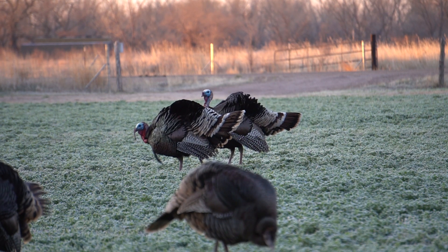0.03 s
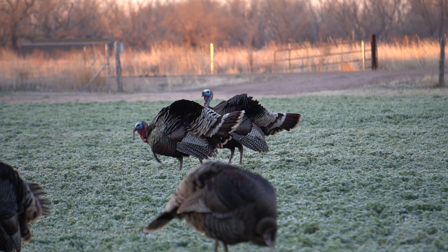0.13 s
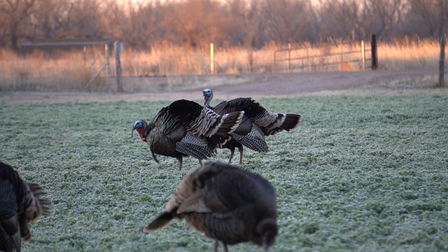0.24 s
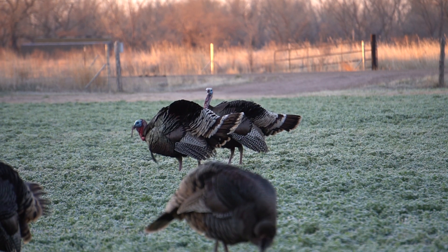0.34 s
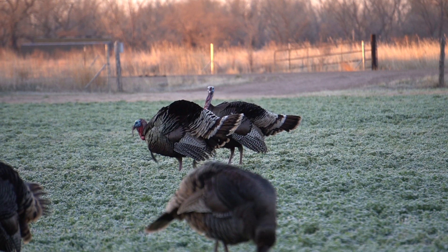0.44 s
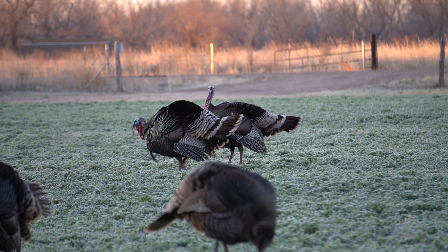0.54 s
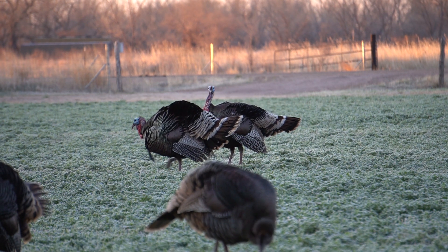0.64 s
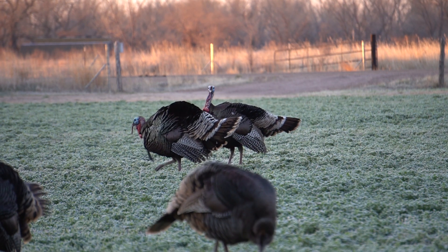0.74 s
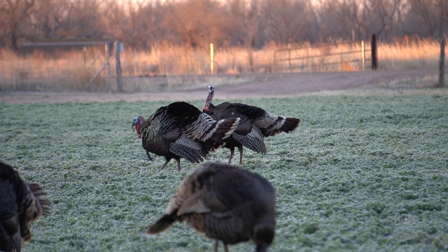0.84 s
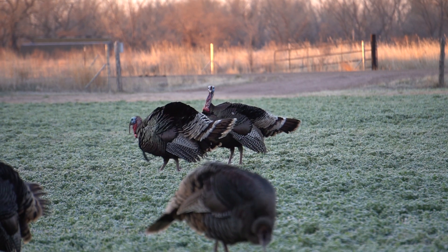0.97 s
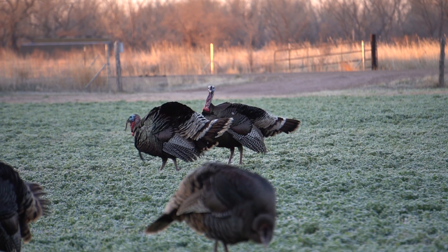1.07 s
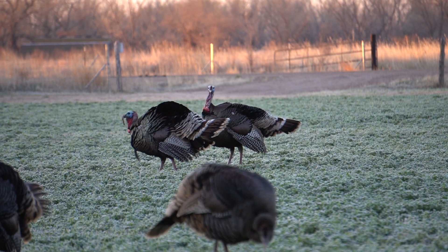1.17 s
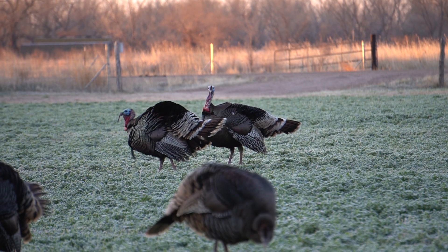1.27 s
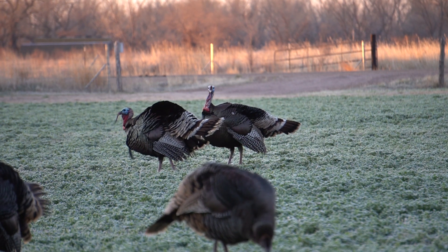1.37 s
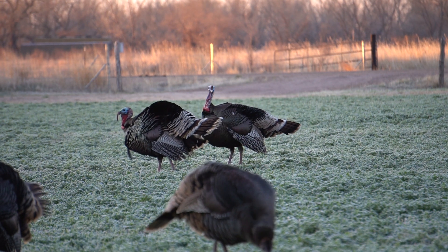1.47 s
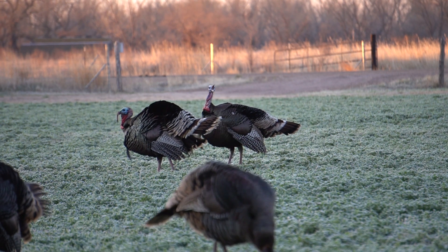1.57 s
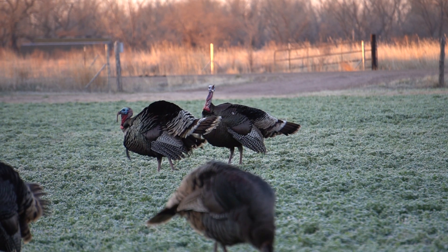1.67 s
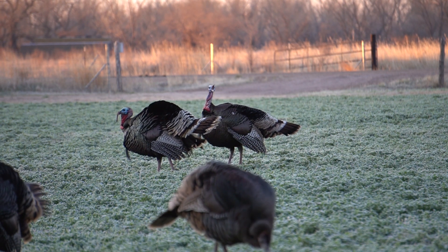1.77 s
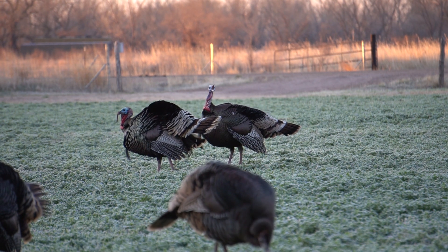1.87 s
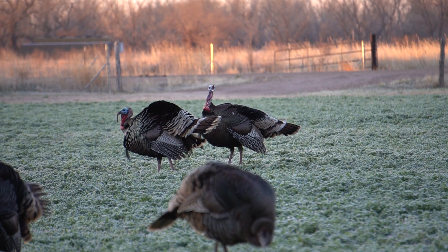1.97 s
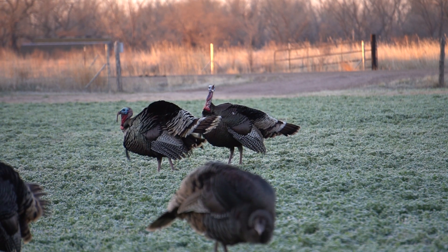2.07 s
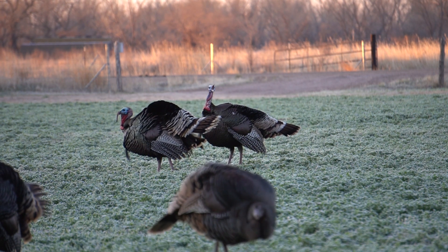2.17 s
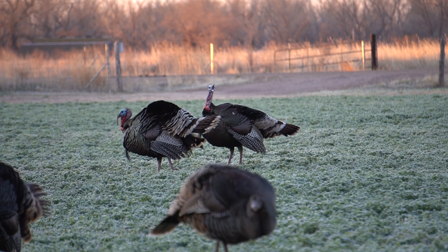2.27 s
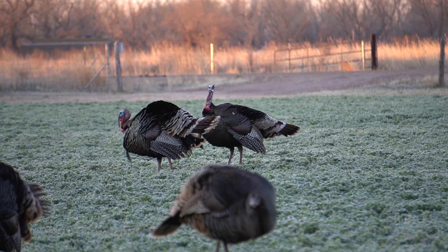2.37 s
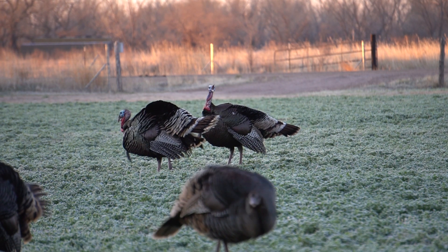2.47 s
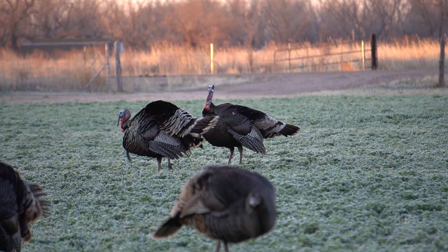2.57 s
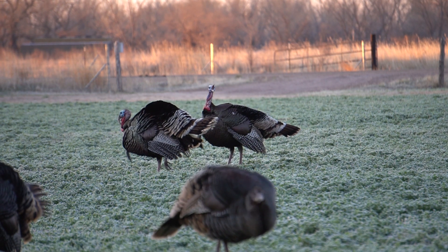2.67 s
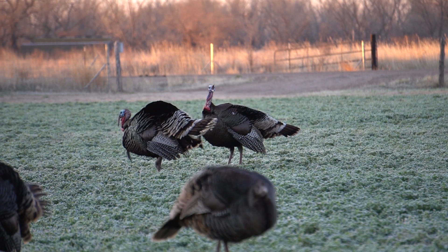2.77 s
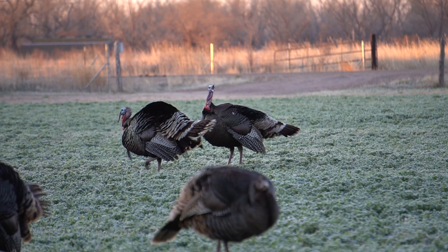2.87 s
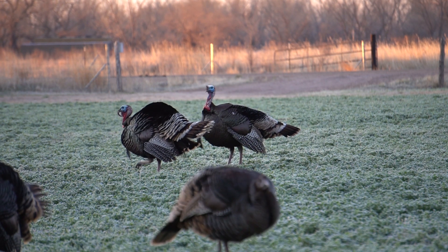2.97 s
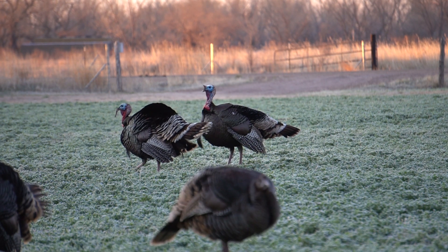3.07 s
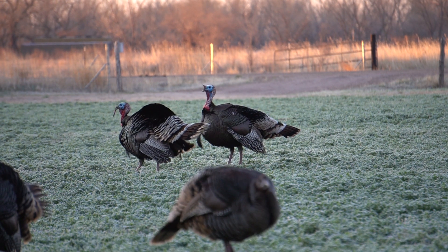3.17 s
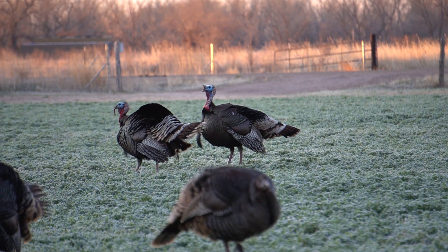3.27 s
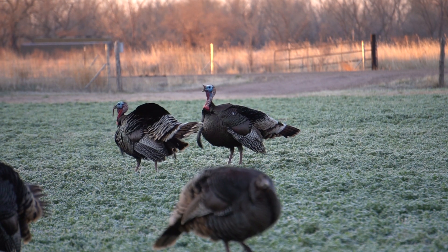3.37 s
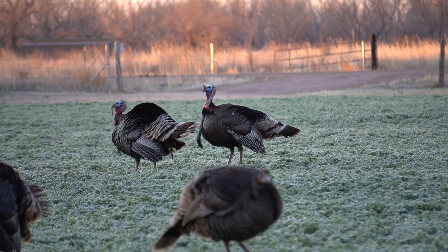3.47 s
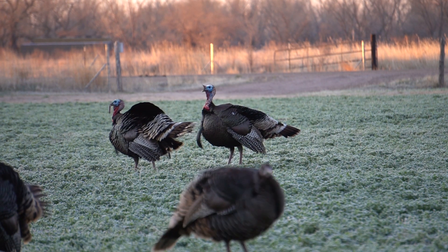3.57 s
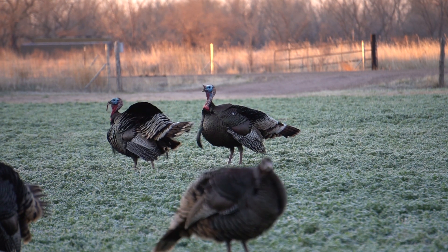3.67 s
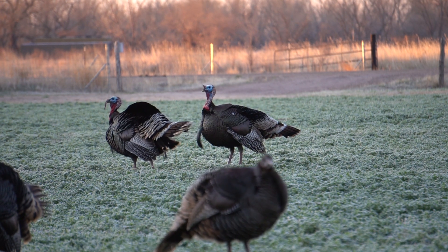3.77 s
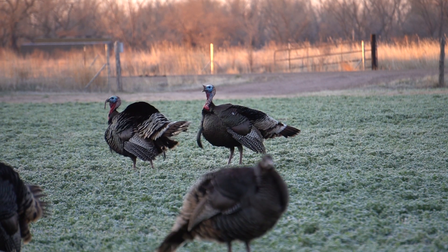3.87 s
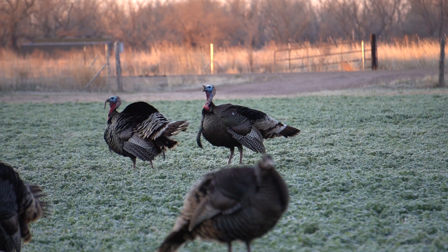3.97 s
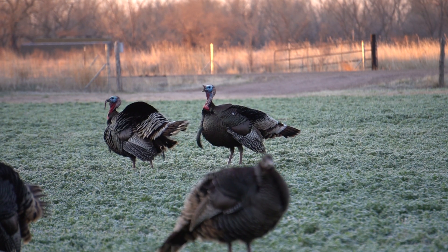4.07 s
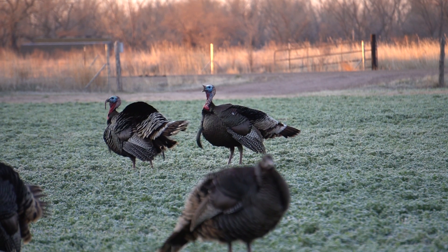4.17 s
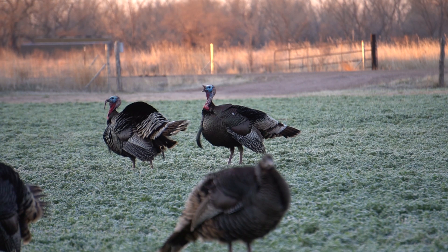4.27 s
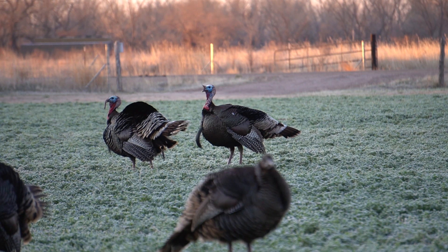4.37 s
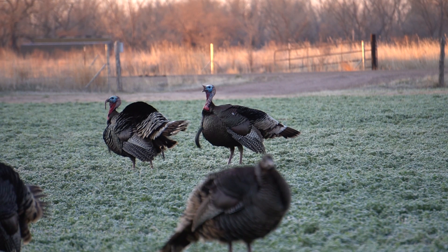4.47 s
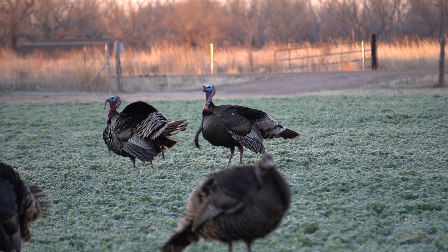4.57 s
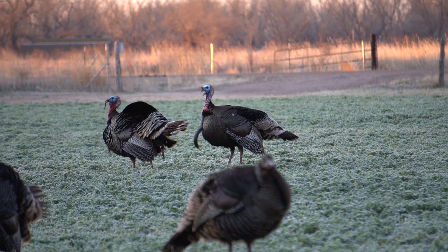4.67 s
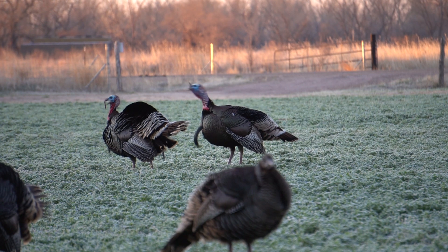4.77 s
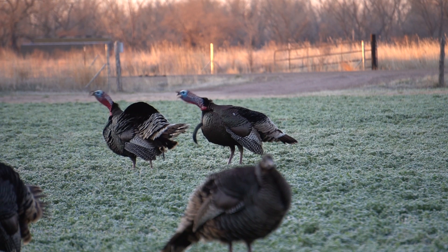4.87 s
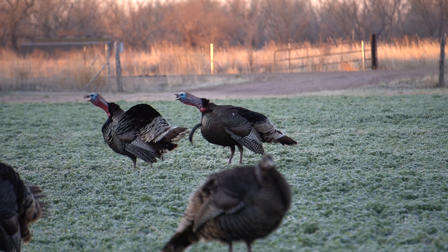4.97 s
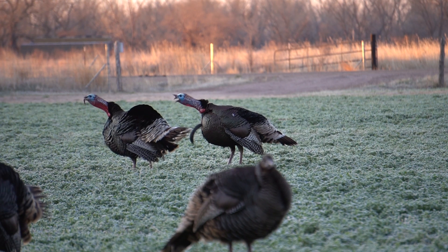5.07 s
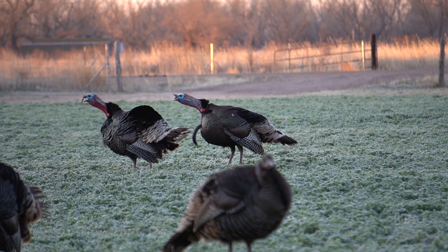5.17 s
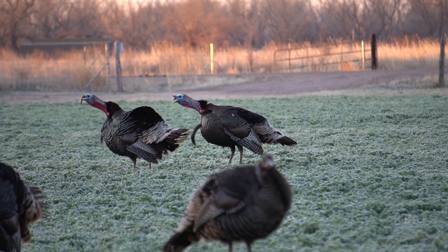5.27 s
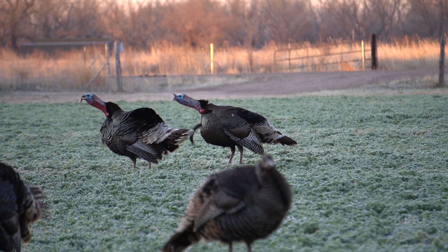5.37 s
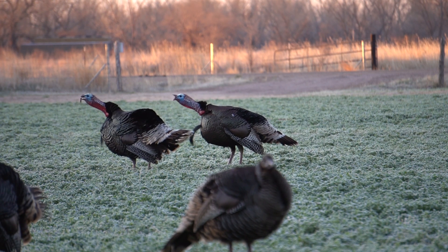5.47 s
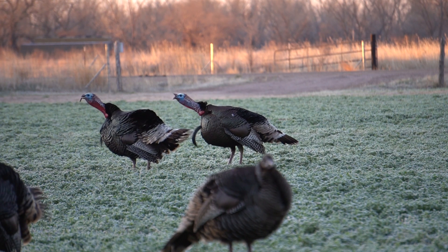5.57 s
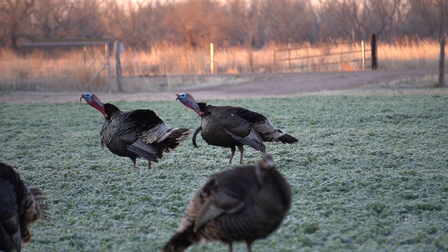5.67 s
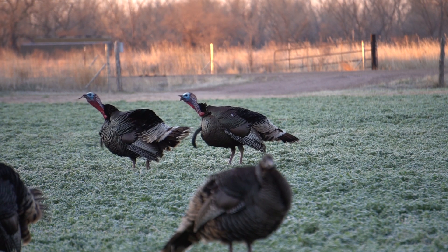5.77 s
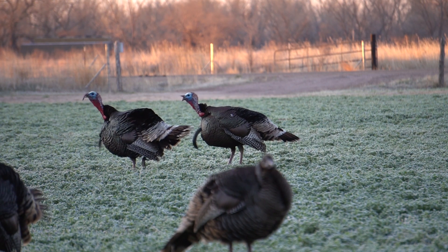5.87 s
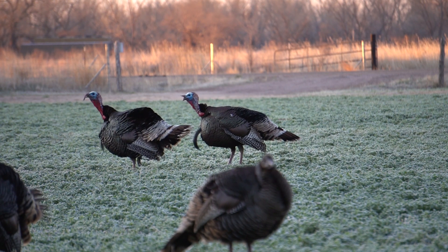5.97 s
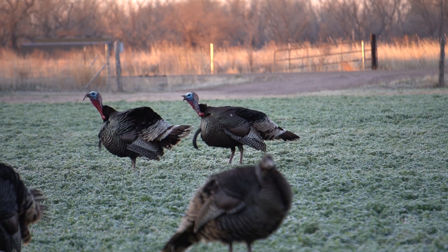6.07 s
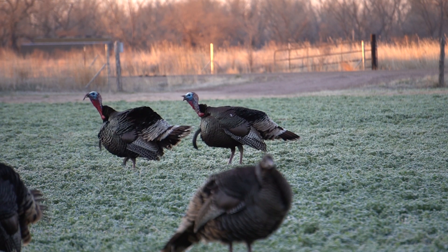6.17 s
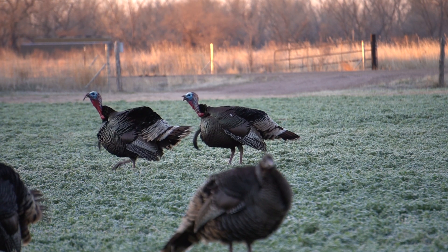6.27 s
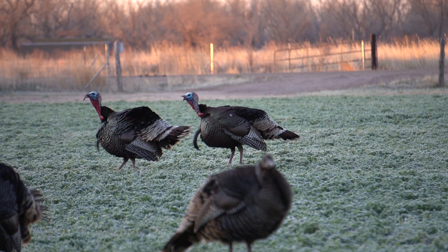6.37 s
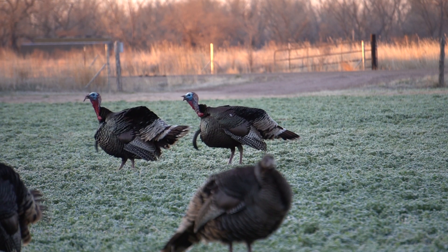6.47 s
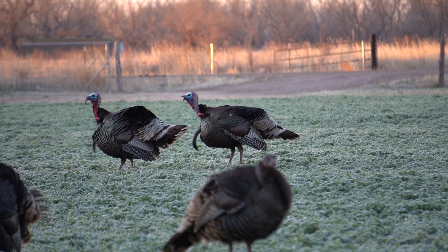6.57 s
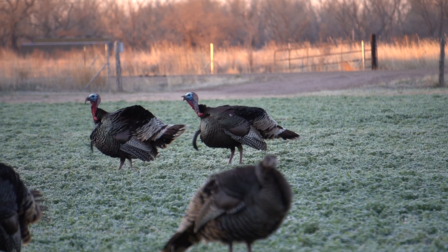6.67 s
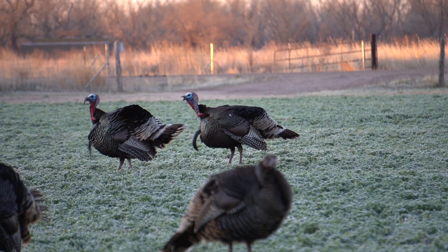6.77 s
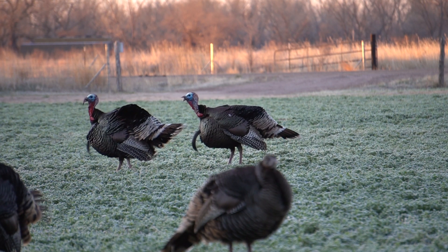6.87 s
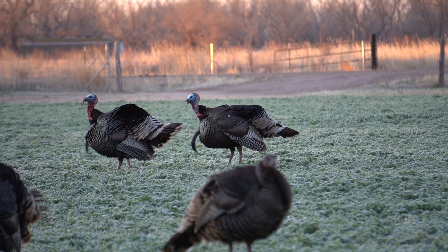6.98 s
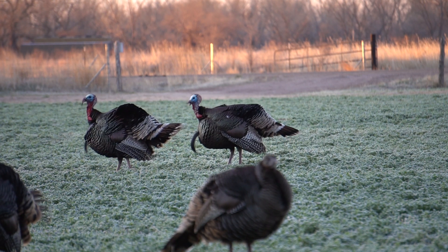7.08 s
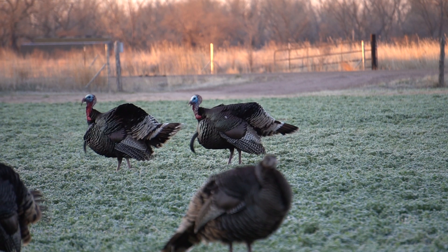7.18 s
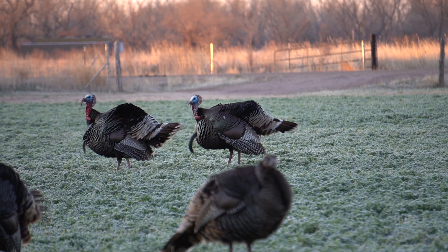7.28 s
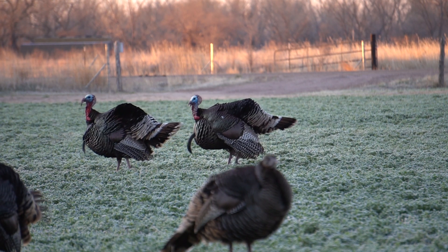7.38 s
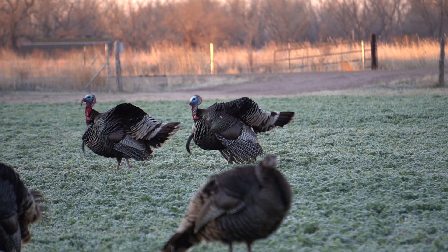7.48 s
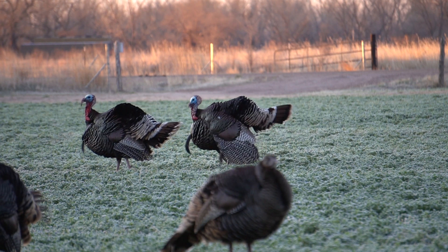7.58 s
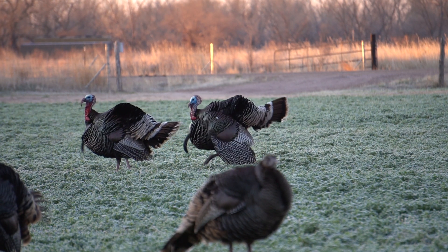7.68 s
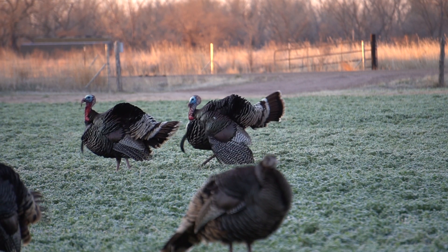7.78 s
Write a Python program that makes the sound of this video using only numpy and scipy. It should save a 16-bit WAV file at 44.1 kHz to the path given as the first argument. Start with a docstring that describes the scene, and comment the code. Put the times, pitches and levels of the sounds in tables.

```python
"""Wild turkeys on a frosty field: a nearby hen gives a long whine of run-together wavering notes and a
run of sharp clucks, made by harmonic pulses through throat resonances. Two toms answer with one rattling
gobble, two such voices in three resonances, opened by harsh yaps over a low drum. Songbirds twitter as
gliding sines in the far trees, above a distant rumble and hiss of shaped noise. Diffuse reflections
surround the birds; gain control ducks the loud calls and clips their onsets."""
import sys
import numpy as np
from scipy import signal
from scipy.fft import rfft, irfft, next_fast_len
from scipy.io import wavfile
from scipy.ndimage import uniform_filter1d, map_coordinates

SR = 44100
rng = np.random.default_rng(int(sys.argv[2]) if len(sys.argv) > 2 else 0)


def transcribe(u):
    """Save the signal u as a 16-bit wav file named by the first command-line argument.

    u: samples, shape (n,) or (channels, n), limited to [-1, 1]; the rate is SR.
    q: integer samples, one column per channel.
    """
    v = np.clip(np.atleast_2d(u).T, -1, 1)
    q = np.round(v * 32767).astype(np.int16)
    wavfile.write(sys.argv[1], SR, q)


N = 344862


def amp(db):
    """Logarithmic level: decibels to an amplitude ratio."""
    return 10 ** (np.asarray(db) / 20)


def unit(x):
    """Power normalisation: scale to rms 1."""
    return x / np.sqrt(np.mean(x ** 2) + 1e-20)


def along(points, hz):
    """Logarithmic frequency scale: interpolate (Hz, value) points along it."""
    f, v = np.transpose(points)
    return np.interp(np.log(hz + 1), np.log(f + 1), v)


def curves(rows, t):
    """Linear interpolation: each column after the first, read at times t."""
    s, *columns = np.transpose(rows)
    return [np.interp(t, s, column) for column in columns]


def span(rows):
    """Uniform sampling: times from a table's first row to its last."""
    return np.arange(rows[0][0], rows[-1][0], 1 / SR)


def add(track, s, x):
    """Superposition: mix x into the track at s seconds."""
    start = int(np.clip(s * SR, 0, N))
    track[start:start + len(x)] += x[:N - start]


def wobble(rate, size):
    """Band-limited fluctuation: a smooth random curve with rate knots a second."""
    knots = rng.standard_normal(int(size * rate / SR) + 4)
    return map_coordinates(knots, [np.arange(size) * rate / SR])


def coloured(x, points):
    """Linear filtering: x through a (Hz, dB) response."""
    m = next_fast_len(len(x) + 8192)
    gain = amp(along(points, np.fft.rfftfreq(m, 1 / SR)))
    return irfft(rfft(x, m) * gain, m)[:len(x)]


def level(x, seconds):
    """Short-time energy: running rms."""
    window = max(int(seconds * SR), 2)
    return np.sqrt(np.abs(uniform_filter1d(x * x, window)) + 1e-12)


def gate(t, length, attack, release):
    """Raised-cosine envelope: smooth rise, hold until length, smooth fall."""
    ramp = np.clip(np.minimum(t / attack, 1 + (length - t) / release), 0, 1)
    return np.sin(np.pi / 2 * ramp) ** 2


def glide(u, notes_hz):
    """Continuous pitch: a parabola through three frequencies as u goes from 0 to 1."""
    return np.polyval(np.polyfit([0, .5, 1], notes_hz, 2), u)


def syrinx(pitch, rough, jitter, flutter, air):
    """Membrane oscillation: roughness shakes pulse timing and size and lets air through once a cycle."""
    size = len(pitch)
    phase = 2 * np.pi * np.cumsum(pitch * (1 + jitter * rough * wobble(500, size))) / SR
    pulses = unit(sum(np.cos(k * phase) for k in range(1, 17)))
    breath = (1 + np.cos(phase)) * rng.standard_normal(size)
    return pulses * (1 + flutter * rough * wobble(600, size)) + air * rough * breath


def expanded(db):
    """Level expansion: louder calls are raised further, ahead of the gain control that ducks them."""
    return db + 1.134 * np.logaddexp(0, (db + 21.0) / 2)


# resonances of the hen's throat: hz, gain_db
HEN_RESONANCES = [(400, -82), (680, -62.5), (1000, -7.5), (1280, 7.5), (1450, -3), (1700, 1), (1980, -7),
                  (2250, -18), (2650, -20), (3400, -28), (4100, -34.5), (4750, -36), (5900, -49.5),
                  (6700, -54.5), (11000, -77)]
# the hen's whine: time_s, pitch_hz, level_db (before expansion)
WHINE_PATH = [(0.43, 671, -30), (0.444, 654, -9), (0.488, 686, -13.5), (0.55, 659.4, -8.5),
              (0.602, 628, -12.5), (0.614, 640, -5), (0.632, 681.4, -6.5), (0.662, 680, -4.5),
              (0.688, 640, -14.5), (0.698, 661, -4.5), (0.71, 658, -20.5), (0.748, 645.6, -9),
              (0.796, 677.2, -6), (0.844, 643, -4), (0.88, 702, -8.5), (0.898, 685.2, -23.5),
              (0.912, 676, -7), (0.956, 667, -18.5), (0.966, 659, -6), (1.01, 684.6, -4.5),
              (1.118, 674.7, -7.5), (1.138, 698, 0), (1.206, 662, -17), (1.222, 650, -41)]
# the whine breaks into a rasp: centre_s, half_width_s, added_roughness (0-1)
WHINE_RASPS = [(.612, .015, 0.38), (0.884, .02, 0.28), (1.08, 0.014, 0.62), (1.122, .014, .35),
               (1.191, .015, 0.21)]
# colour added by the half-open beak: hz, gain_db
BEAK_RESONANCES = [(1500, -2), (2000, 5.5), (2650, 0), (3400, 2.5), (4080, -3.5), (4750, 4.5), (5400, -0.5),
                   (8000, -2.5)]
# the upper overtones brighten steadily, then jump around the moment of strain
BRIGHT_DB, BRIGHTEN_DB_PER_S, STRAIN_DB, STRAIN_S = -34.5, 7.5, 6, 0.93


def whine():
    """Source and filter: a long whine of run-together wavering notes brightens and breaks into rasps."""
    t, out = span(WHINE_PATH), np.zeros(N)
    size = len(t)
    pitch, level_db = curves(WHINE_PATH, t)
    rasp = sum(amount * np.exp(-((t - s) / width) ** 2) for s, width, amount in WHINE_RASPS)
    strain = np.clip((t - STRAIN_S) / 0.084 + .5, 0, 1)
    rough = 0.11 + .06 * strain + rasp
    bright_db = BRIGHT_DB + BRIGHTEN_DB_PER_S * (t - t[0]) + STRAIN_DB * strain + 5 * rasp
    wavering_pitch = pitch * (1 + 0.013 * wobble(200, size))
    source = syrinx(wavering_pitch, rough, jitter=0.053, flutter=0.43, air=0.25)
    # the half-open beak lifts the upper resonances
    voice = coloured(coloured(source, HEN_RESONANCES), BEAK_RESONANCES)
    upper = coloured(voice, [(2600, -47.0), (3100, 0)])
    # the weak upper overtones come and go and fray into a rasp
    frayed = unit(upper * (1 + 0.14 * wobble(410, size)) * amp(1.5 * wobble(42, size)))
    voice = unit(voice - upper) + amp(bright_db) * frayed
    quaver = amp(3.4 * rough * wobble(92, size))
    envelope = gate(t - t[0], t[-1] - t[0] - .014, 0.0063, .014)
    add(out, t[0], voice * quaver * envelope * amp(expanded(level_db) - 5.5))
    return out


# the hen's clucks: start_s, length_s, start_hz (before the quick bend), level_db (before expansion)
CLUCK_CALLS = [(0.352, 0.023, 636, -15), (1.925, 0.0094, 625, -21), (2.232, 0.013, 632, -18.5),
               (2.253, 0.025, 604, -17), (2.321, 0.025, 603, -11), (2.655, 0.084, 620.4, -10),
               (2.977, 0.093, 686, -9.5), (3.308, 0.085, 694.5, -8), (3.633, 0.064, 689.6, -7.5),
               (3.957, 0.072, 696.3, -6.5), (4.311, 0.093, 684, -7.5), (4.694, 0.06, 632.5, -8.5),
               (6.807, 0.017, 638, -28.5), (6.874, 0.045, 673, -14), (6.948, 0.029, 643, -17.5),
               (7.201, 0.061, 663, -9), (7.505, 0.06, 669, -7.5), (7.797, 0.13, 678, -7)]
REST_HZ, RELAX_S = 629, .09  # a cluck's pitch relaxes towards rest
DROOP_HZ_PER_S = 430  # its tail bends down
BEND, BEND_S = 0.074, 0.0099  # a hard cluck starts this fraction sharp and bends down quickly
BURST_S, BURST_DB = 0.02, 0.5  # its opening burst is louder and rougher
DULLING_DB_PER_S = 39.5  # the overtones fade faster than the note
CLUCK_ROUGH, CLUCK_WAVER_DB = .2, 2.6  # roughness 0-1; uneven level after the burst


def clucks():
    """Damped oscillation: each cluck bursts out, relaxes and dies away; a tenser syrinx is brighter."""
    out = np.zeros(N)
    for s, length, start_hz, level_db in CLUCK_CALLS:
        t = np.arange(int((length + 0.055) * SR)) / SR
        hard = np.clip((length - .04) / 0.018, 0, 1)  # longer clucks are harder
        burst = hard * np.exp(-t / BURST_S)
        pitch = REST_HZ + (start_hz - REST_HZ) * np.exp(-t / RELAX_S)
        pitch -= DROOP_HZ_PER_S * np.maximum(t - 0.57 * length, 0)
        pitch *= 1 + BEND * hard * np.exp(-t / BEND_S) + 0.015 * wobble(119.7, len(t))
        source = syrinx(pitch, CLUCK_ROUGH + .3 * burst, jitter=0.07, flutter=0.3, air=0.55)
        voice = unit(coloured(source, HEN_RESONANCES))
        upper_shape = [(1500, -25), (1950, -7.5), (2700, -6.5), (4100, -2.5), (4800, 0.5), (7000, 2.5)]
        upper = coloured(voice, upper_shape)
        tension_db = 0.068 * (start_hz - 665) + 7 * (hard - .6) + 3 * burst - DULLING_DB_PER_S * t
        voice += (amp(tension_db) - 1) * upper
        rise = np.clip(t / (.004 + 0.0087 * (1 - hard)), 0, 1) ** 2
        waver_db = CLUCK_WAVER_DB * (1 - burst) * wobble(92, len(t))
        # a slow decay, then an abrupt stop near the end
        decay_db = -5 * t / length - 2300 * np.maximum(t - 0.95 * length, 0)
        fall = amp(BURST_DB * burst + decay_db + waver_db)
        add(out, s, voice * rise * fall * amp(expanded(level_db) + 4.5 - 3.92 * hard))
    return out


ATTACK_S, RELEASE_S, SAG_DB = 0.011, 0.014, 2.5  # shape of every syllable
LINGER_DB, LINGER_S = -9.5, 0.015  # a weaker sound lingers after each push


def syllable(t, length):
    """Amplitude modulation: a quick push that sags, then a weaker lingering tail."""
    push = gate(t, length - RELEASE_S / 2, ATTACK_S, RELEASE_S)
    push = push * amp(-SAG_DB * np.clip(t / length, 0, 1))
    tail = gate(t, length + LINGER_S / 3, ATTACK_S, LINGER_S)
    return np.maximum(push, amp(LINGER_DB) * tail)


# the toms' three throat resonances: hz, gain_db
TOM_LOW_RESONANCE = [(300, -30), (560, -22), (750, -10), (1050, -1.5), (1380, -7), (1700, -29),
                     (2600, -47.5)]
TOM_MIDDLE_RESONANCE = [(900, -41), (1400, -14.5), (1750, 9), (2100, -2), (2600, -12.5), (4000, -61)]
TOM_HIGH_RESONANCE = [(1400, -54), (2250, -10), (2800, 4), (3200, 5.5), (3800, -6), (4700, -9.5),
                      (5600, -22.5), (6800, -44), (8500, -40), (10700, -34), (12000, -68)]
# the gobble's syllables: start_s, length_s, low_db, middle_db, high_db (drive before the ceiling)
GOBBLE_SYLLABLES = [(4.802, .046, -26, -10.5, -22.5), (4.873, .05, -16, -19.5, -16),
                    (4.925, 0.0435, -16.5, -24, -23), (4.97, 0.027, -21, -29, -15),
                    (5.027, 0.073, -21, -21, -13), (5.098, .068, -19.5, -23.5, -14.5),
                    (5.171, 0.044, -18.5, -24, -13.5), (5.233, .054, -22.5, -22, -15.5),
                    (5.289, .052, -24, -18, -14.5), (5.349, .072, -25.5, -27, -18),
                    (5.433, .072, -23, -27, -19.5), (5.52, 0.0192, -29, -26, -20),
                    (5.547, 0.0305, -26.5, -25, -22.5), (5.614, 0.024, -21.5, -31, -25),
                    (5.652, .05, -28, -39, -30.5), (5.721, 0.0443, -31, -33.5, -28),
                    (5.773, 0.04, -38.5, -40, -36)]
# the leading tom flips into his clear register: start_s (the rise begins 5.1 ms before), length_s
CLEAR_FLIPS = [(4.948, .024), (5.113, 0.037), (5.171, .018), (5.298, .016), (5.352, 0.039), (5.538, .022),
               (5.657, 0.0433)]
HARSH_HZ, CLEAR_HZ = 600.3, 694  # his two registers
SECOND_TOM_HZ, SECOND_SAG_HZ_PER_S = 563.5, 75  # the other tom stays low and sinks
RATTLE_DB, SHAKE_DB = 2.5, 4  # fast tremble of the whole voice; slower shake of each resonance
SWOOP_DB = 4  # loss of the upper side during each syllable
GOBBLE_CEILING_DB = -11.5  # soft limit on the gobble's level


def gobble():
    """Coupled resonance: two toms rattle through three throat resonances, mixed anew each syllable."""
    t = np.arange(GOBBLE_SYLLABLES[0][0], GOBBLE_SYLLABLES[-1][0] + .2, 1 / SR)
    size, out = len(t), np.zeros(N)
    starts, lengths, *_ = np.transpose(GOBBLE_SYLLABLES)
    current = np.searchsorted(starts, t, side="right") - 1
    progress = np.clip((t - starts[current]) / lengths[current], 0, 1)
    progress = uniform_filter1d(progress, size=300)
    flips = sum(gate(t - s + 0.0051, length, .01, 0.0085) for s, length in CLEAR_FLIPS)
    clear = np.clip(flips, 0, 1)
    rough = .62 - .5 * clear
    pitch = HARSH_HZ + (CLEAR_HZ - HARSH_HZ) * clear
    pitch = pitch * (1 + 0.05 * rough * wobble(130, size))
    low_pitch = SECOND_TOM_HZ - SECOND_SAG_HZ_PER_S * (t - t[0]) - 45 * (progress - .5)
    low_pitch = low_pitch * (1 + 0.039 * wobble(55, size))
    lead = syrinx(pitch, rough, jitter=0.05, flutter=.7, air=0.45)
    second = syrinx(low_pitch, .35, jitter=.05, flutter=.8, air=0.2)
    rattle_db = RATTLE_DB * rough * wobble(140, size)
    for k, throat in enumerate((TOM_LOW_RESONANCE, TOM_MIDDLE_RESONANCE, TOM_HIGH_RESONANCE)):
        push = sum(syllable(t - s, length) * amp(dbs[k]) for s, length, *dbs in GOBBLE_SYLLABLES)
        # now one bird, now the other dominates each resonance
        balance = (0.27 + 1.44 * rough) * amp(4.7 * wobble(33.97, size))
        band = coloured(lead + balance * second, throat)
        # the high resonance slides from its upper to its lower side
        upper_side = coloured(band, [(2750, -21), (3050, 4)])
        band = band + upper_side * (amp(-1 - SWOOP_DB * progress) - 1)
        shake_db = SHAKE_DB * wobble(55.09, size)
        add(out, t[0], band / level(band, 0.018) * push * amp(rattle_db + shake_db))
    out += yaps()
    # a soft ceiling rounds off the gobble's loudest moments
    return out / (1 + (level(out, .002) / amp(GOBBLE_CEILING_DB)) ** 4) ** (1 / 4)


# harsh yaps in the gobble's opening: start_s, length_s, start_hz, middle_hz, end_hz (resonance),
# level_db (before the ceiling)
YAP_CALLS = [(4.802, 0.058, 1514, 1920, 1100, -15), (4.895, 0.053, 3260, 2600, 1300, -7)]


def yaps():
    """Pulse excitation: uneven pulses each ring one swooping throat resonance as the neck shoots out."""
    out = np.zeros(N)
    for s, length, *notes_hz, db in YAP_CALLS:
        t = np.arange(int(length * SR)) / SR
        rate = 480 * (1 + 0.082 * wobble(295, len(t)))  # pulses per second
        pulse_scatter = .4 * wobble(500, len(t))
        cycle = np.cumsum(rate) / SR % 1
        decay = np.sin(np.pi * cycle) * np.exp(-1.2 * cycle)
        ring = decay * np.sin(2 * np.pi * glide(t / length, notes_hz) * cycle / rate)
        envelope = gate(t, length - RELEASE_S, .012, RELEASE_S)
        add(out, s, unit(ring * (1 + pulse_scatter)) * envelope * amp(db))
    return out


DRUM_S, DRUM_LENGTH_S, DRUM_FADE_S, DRUM_DB = 4.77, 1.12, 0.069, -36  # mean level, which wavers


def drum():
    """Low harmonic oscillation: the toms' chests throb deeply under the gobble."""
    t, out = np.arange(int(DRUM_LENGTH_S * SR)) / SR, np.zeros(N)
    phase = 2 * np.pi * np.cumsum(71 * (1 + 0.14 * wobble(41, len(t)))) / SR
    throb = unit(np.sin(phase) + .3 * np.sin(2 * phase) + 0.12 * np.sin(3 * phase))
    envelope = gate(t, DRUM_LENGTH_S - DRUM_FADE_S, DRUM_FADE_S, DRUM_FADE_S)
    add(out, DRUM_S, throb * envelope * amp(DRUM_DB + 3.9 * wobble(25, len(t))))
    return out


ARCH_HZ = 89  # every slur bows upward at its middle


def slur(length, start_hz, end_hz, db):
    """Frequency modulation: a pure whistle gliding in a shallow arch."""
    u = np.linspace(0, 1, int(length * SR))
    pitch = glide(u, [start_hz, (start_hz + end_hz) / 2 + ARCH_HZ, end_hz])
    pitch = pitch * (1 + 0.011 * wobble(150, len(u)))
    return amp(db) * np.sin(np.pi * u) * np.sin(2 * np.pi * np.cumsum(pitch) / SR)


# nearer songbird slurs: start_s, length_s, start_hz, end_hz, level_db (peak)
SONGBIRD_SLURS = [(0, 0.11, 3190, 2510, -37.5), (0.195, 0.035, 3050, 3040, -36),
                  (1.289, .12, 3020, 2410, -41.5), (1.414, .13, 2640, 3000, -41),
                  (1.765, 0.069, 2980, 2807, -40), (1.851, 0.29, 2230, 2427, -42),
                  (2.03, 0.14, 3300, 2650, -40), (2.454, 0.31, 2440, 2595, -47),
                  (3.23, 0.103, 2640, 2770, -38), (3.887, 0.056, 3070, 2660, -36),
                  (3.513, .1, 2080, 2570, -46.5), (4.15, .13, 2630, 3149, -38.5),
                  (6.06, 0.075, 3030, 2610, -53), (6.322, 0.075, 2300, 2770, -60),
                  (6.612, .16, 2766, 2480, -42), (7.679, 0.11, 2960, 3300, -45)]
# a small bird's buzzy chips: start_s
CHIP_STARTS = [1.268, 2.06, 4.542, 5.914, 6.089, 6.241, 6.395, 6.56, 6.72]
CHIP_HZ, CHIP_S, CHIP_DB = 4460, .045, -50.5  # mean pitch; length; peak before the random buzz


def songbirds():
    """Modulated pure tones: nearer whistles and buzzy chips over a chorus, denser after the gobble."""
    out = np.zeros(N)
    for s, length, start_hz, end_hz, db in SONGBIRD_SLURS:
        add(out, s, slur(length, start_hz, end_hz, db))
    for s, vary in zip(CHIP_STARTS, rng.standard_normal(len(CHIP_STARTS))):
        hz = CHIP_HZ * (1 + 0.042 * vary)
        chip = slur(CHIP_S, 1.06 * hz, .94 * hz, CHIP_DB)
        add(out, s, chip * wobble(600, len(chip)))
    # the faint chorus: start s, end s, number of slurs
    for start, end, count in [(0, 7.8, 80), (5.85, 6.85, 48)]:
        for when, length, high, bend, loud in rng.random(size=(count, 5)):
            hz, sweep = 2150 + 1100 * high, 0.25 * (bend - .55)
            note = slur(0.047 + 0.1 * length, hz * (1 - sweep), hz * (1 + sweep), -53 + 7 * loud)
            add(out, start + when * (end - start), note)
    return out


def nearby(x, t60):
    """Early scattering: ground and close things beat with gliding notes and shift as the birds move."""
    t, out = np.arange(SR // 10) / SR, np.zeros(N)
    # a fresh random tail crossfades in every half second
    for s in np.arange(0, N / SR + .5, .5):
        tail = rng.standard_normal(len(t)) * amp(-60 * t / t60) * (t > .007)
        share = np.clip(1 - 2 * np.abs(np.arange(N) / SR - s), 0, 1)
        heard = np.flatnonzero(share)
        scattered = signal.fftconvolve((x * share)[heard], tail / np.linalg.norm(tail))
        add(out, heard[0] / SR, scattered)
    return out


# decay of the tree line's reverberation: hz, t60_s
TREE_DECAY = [(500, 0.16), (2500, 0.38), (8000, 0.66)]


def trees(x):
    """Diffuse reverberation: the tree line answers with noise decaying at its own rate per frequency."""
    hz, t, z = signal.stft(rng.standard_normal(SR // 2), SR, nperseg=256)
    decay = amp(-60 * t / along(TREE_DECAY, hz)[:, None])
    tail = signal.istft(z * decay, SR, nperseg=256)[1]
    return signal.fftconvolve(x, tail / np.linalg.norm(tail))[:N]


# spectrum of the distant rumble before its low cut: hz, relative_db (per Hz)
RUMBLE_SPECTRUM = [(13, -31), (22, -1.5), (49, 2), (98, -8.5), (173, -9), (208, -4), (383, -19.5),
                   (444, -14), (543, -9.5), (596, -5), (630, -6.5), (1020, -12), (1470, -26), (1640, -35),
                   (1800, -49.5), (2340, -63), (3960, -120)]
# spectrum of the hiss: hz, relative_db (per Hz)
HISS_SPECTRUM = [(1200, -25), (1900, 0.5), (2900, 0), (3700, -6.5), (5000, -17), (7000, -21), (10700, -20),
                 (11400, -52.5)]


def background():
    """Spectrally shaped noise: a distant rumble and a faint hiss, each slightly unsteady."""
    rumble = unit(coloured(rng.standard_normal(N), RUMBLE_SPECTRUM)) * amp(-32.5 + 1.3 * wobble(20, N))
    hiss = unit(coloured(rng.standard_normal(N), HISS_SPECTRUM)) * amp(-50.5 + 0.25 * wobble(12.0, N))
    return coloured(rumble, [(20, -5.5), (45, 0)]) + hiss


def scene():
    """Superposition: hen, toms and songbirds in the open field."""
    hen, toms, far = whine() + clucks(), gobble(), songbirds()
    scatter = amp(1.5) * nearby(hen, t60=0.065) + amp(-6.5) * nearby(toms, t60=0.13)
    echo = trees(amp(-31) * hen + amp(-39) * toms + amp(-4.5) * far)
    return (hen + toms + scatter + drum() + far + echo + background())[None]


def follower(x, seconds):
    """Envelope detection: rectified level, smoothed with one time constant."""
    keep = np.exp(-1 / (seconds * SR))
    return signal.lfilter([1 - keep], [1, -keep], np.abs(x))


TOP_HZ = 16500  # nothing is heard far above this


def record(dry):
    """Dynamic compression: gain ducks just after loud onsets, whose first peaks clip; the top is dull."""
    slow = follower(dry[0], 0.0077) / amp(-12.5)
    fast = follower(dry[0], .002) / amp(-6.5)
    ducked = dry[0] / (1 + np.maximum(slow, fast) ** 4) ** (1 / 4)
    clipped = np.clip(ducked, -1, 1)
    return coloured(clipped, [(10500, 0), (11800, -11), (TOP_HZ, -14), (TOP_HZ + 300, -120)])[None]


dry = scene()
out = record(dry)
transcribe(out)
```